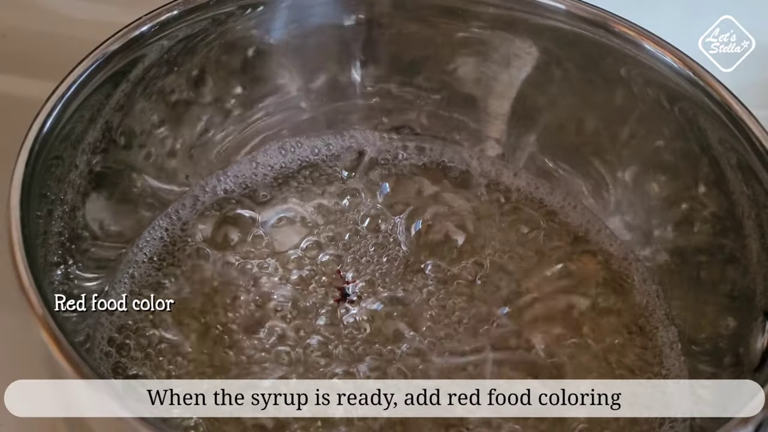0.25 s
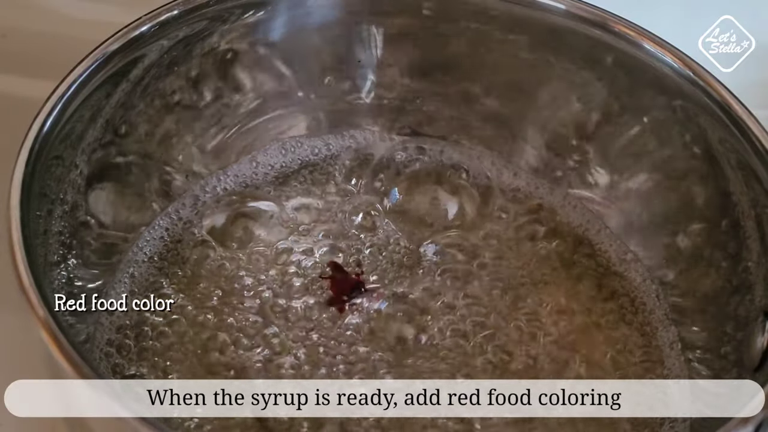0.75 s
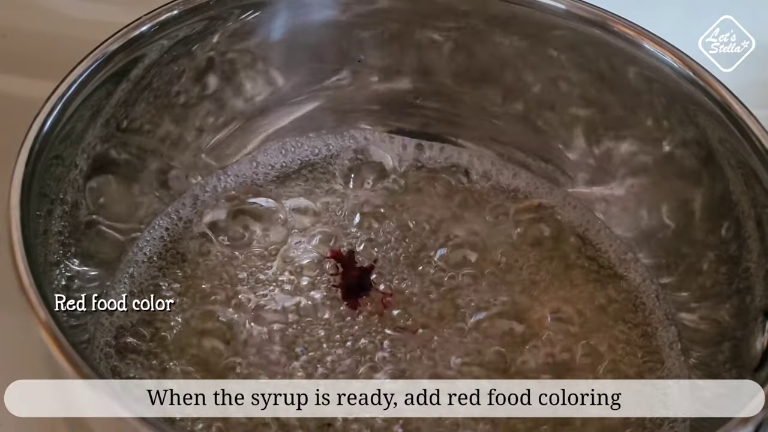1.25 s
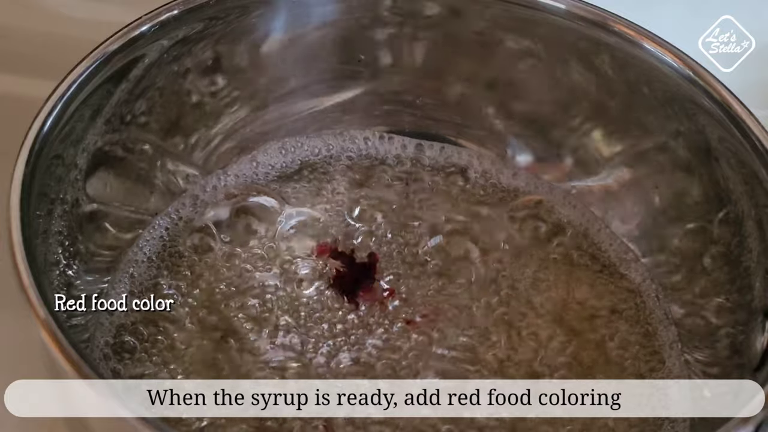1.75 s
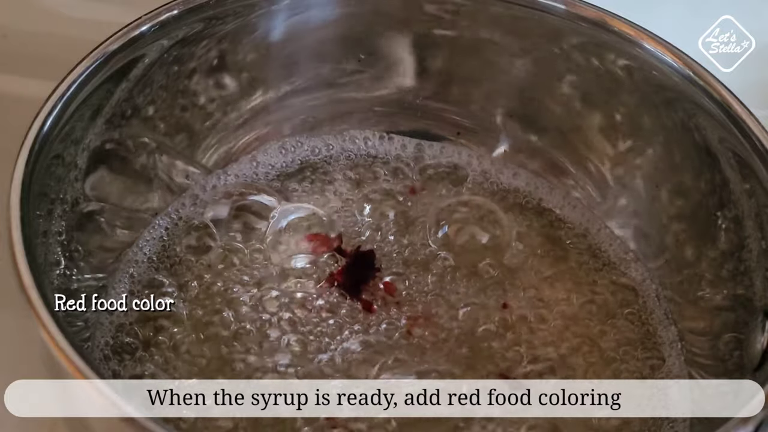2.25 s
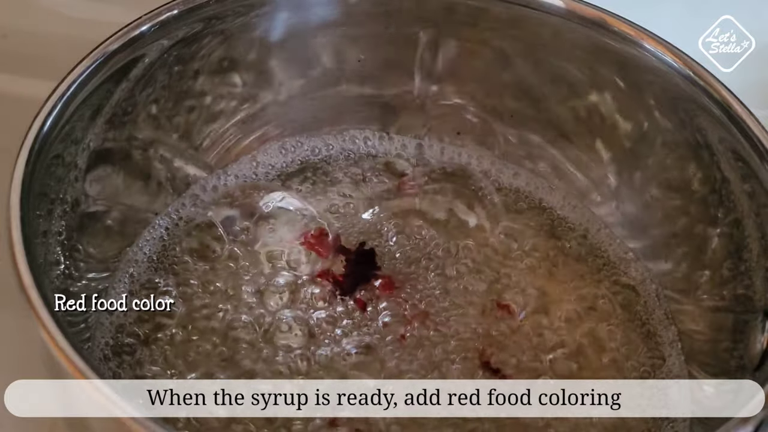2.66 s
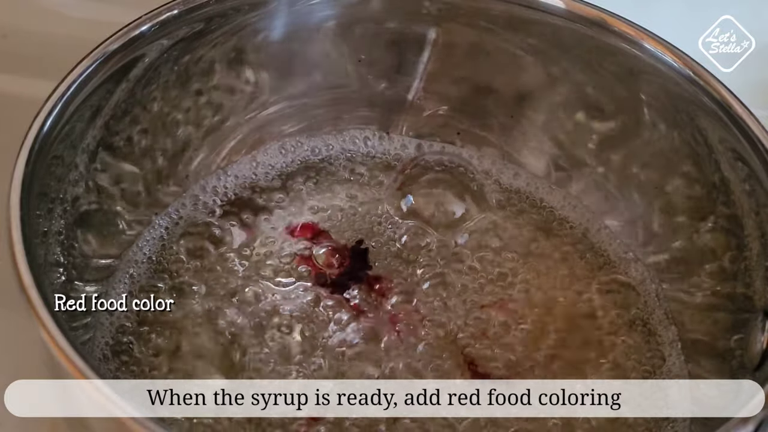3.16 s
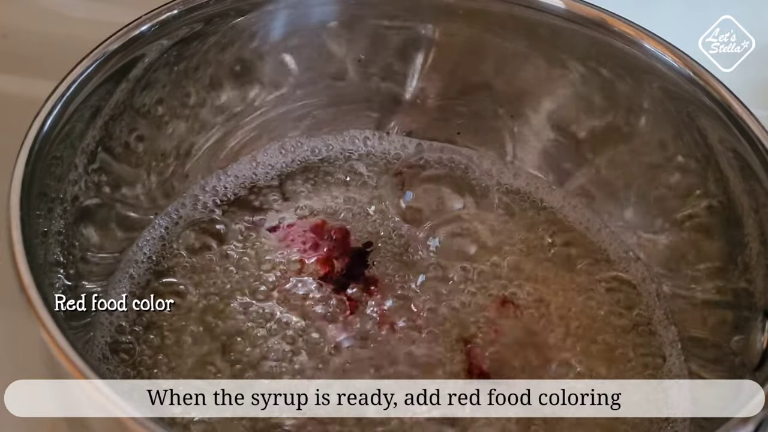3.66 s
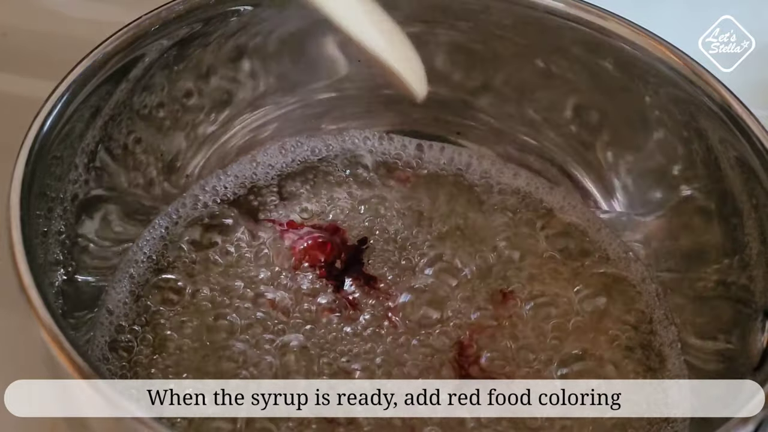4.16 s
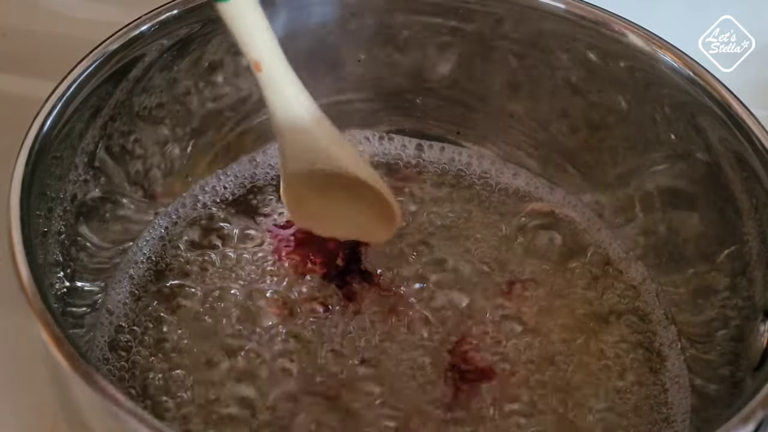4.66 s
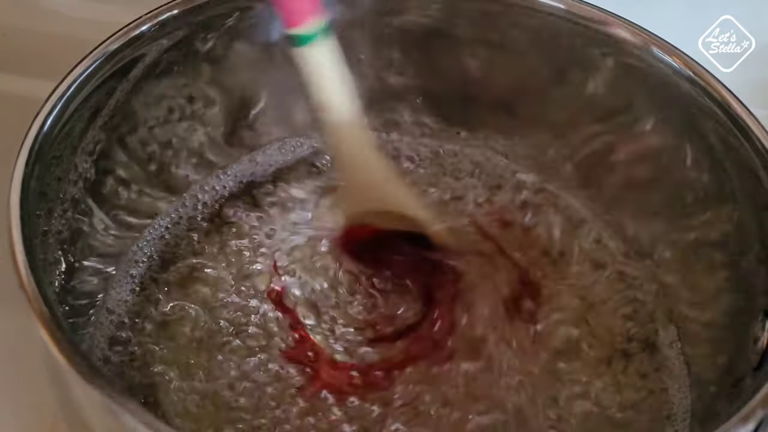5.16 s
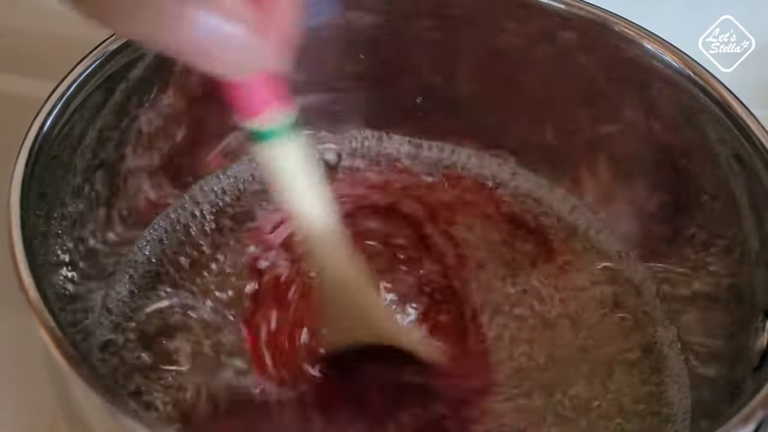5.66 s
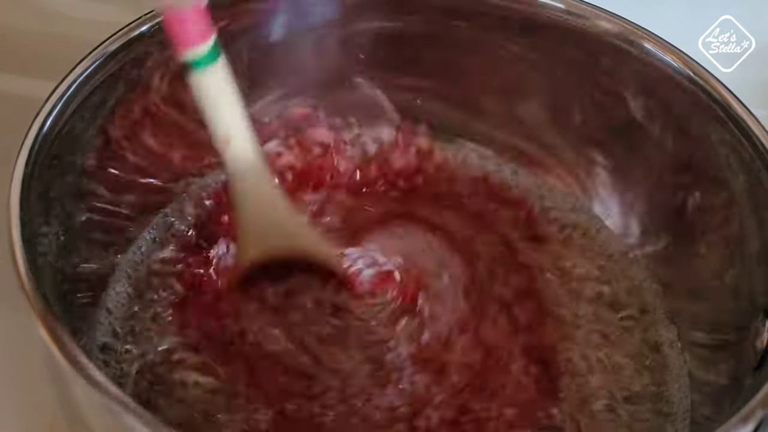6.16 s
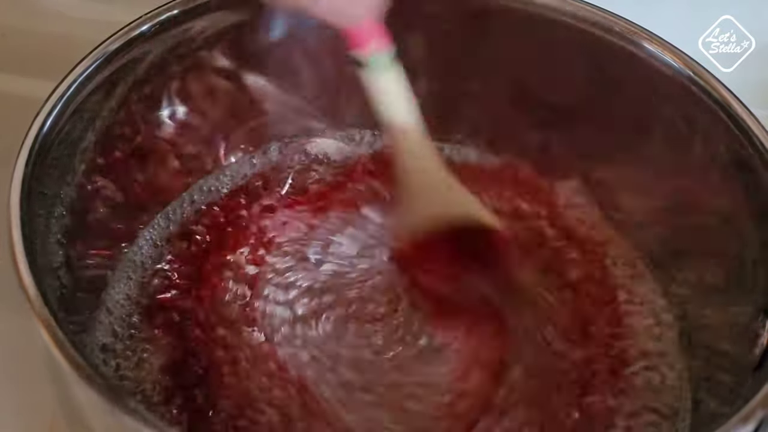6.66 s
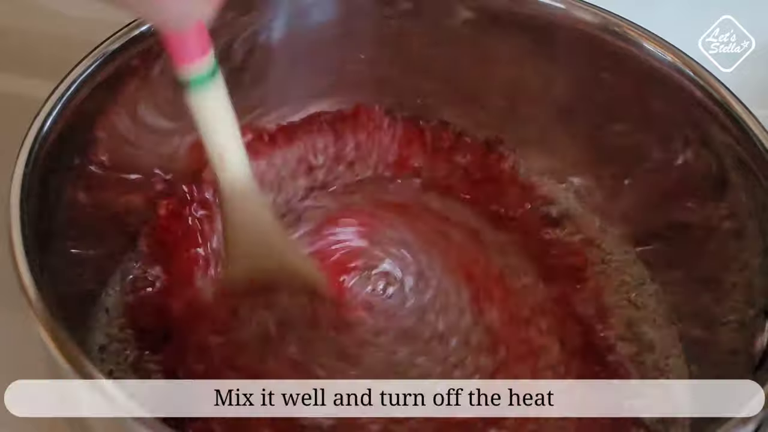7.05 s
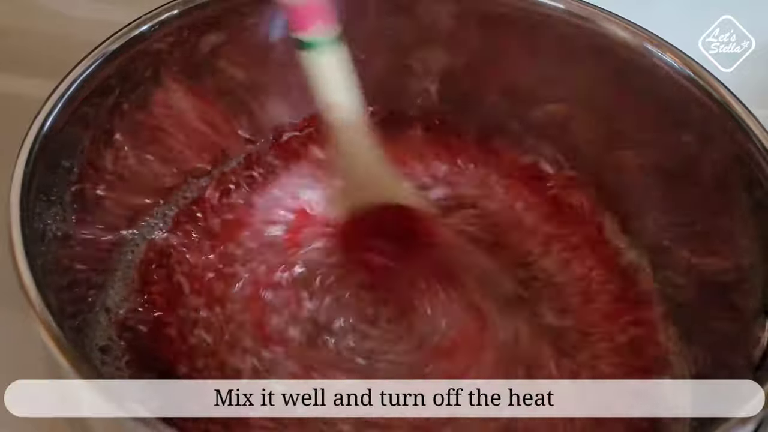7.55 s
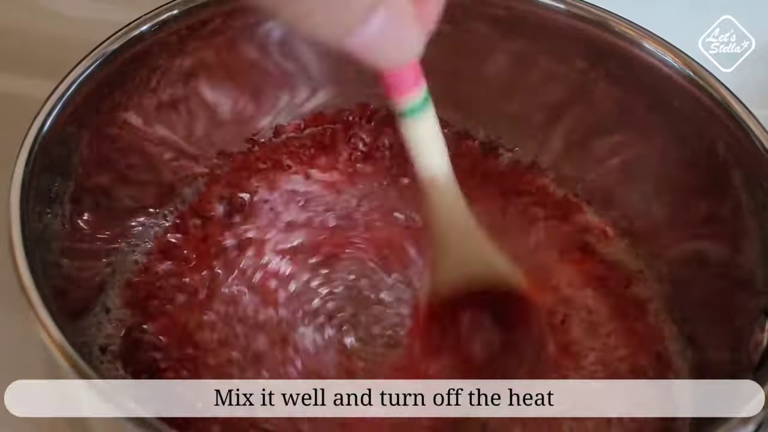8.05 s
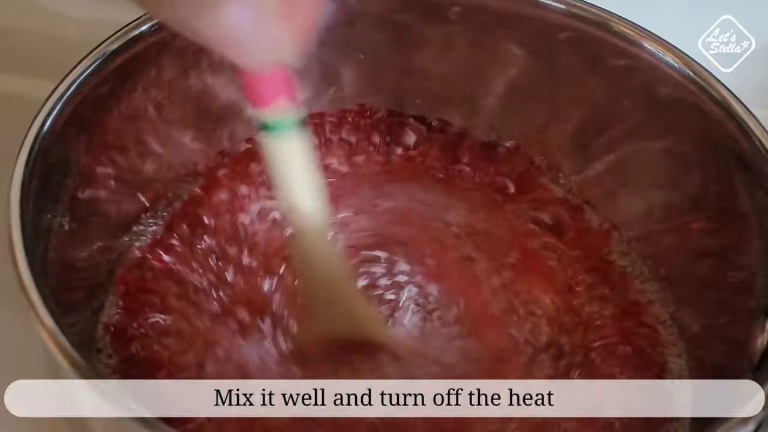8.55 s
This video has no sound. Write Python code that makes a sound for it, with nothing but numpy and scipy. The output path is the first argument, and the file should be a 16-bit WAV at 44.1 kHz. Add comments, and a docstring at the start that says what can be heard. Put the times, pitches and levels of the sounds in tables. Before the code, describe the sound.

Syrup simmers and crackles in a steel pot, with one dull knock, then sizzles and gurgles much louder as it is stirred.

```python
"""Sugar syrup simmers in a steel pot, crackling in swells as its bubbles burst and their cavities ring. Single
bubbles snap, ping and plop, and the air in the pot resonates. From five seconds on a wooden spoon stirs: the
syrup foams up, sizzles much louder and gurgles with each stroke. Near three seconds something knocks dully and
rattles as it settles; near four seconds comes a light knock. The hob hums underneath, in a small kitchen."""
import sys
import numpy as np
from scipy import signal
from scipy.io import wavfile

SR = 44100
rng = np.random.default_rng(int(sys.argv[2]) if len(sys.argv) > 2 else 0)


def waveform_to_disk(signal):
    """Save audio, clipped to [-1, 1], as 16-bit WAV at the path in sys.argv[1]."""
    frames = np.transpose(np.atleast_2d(signal))
    scaled = np.clip(frames, -1, 1) * 32767
    samples = np.round(scaled).astype(np.int16)
    wavfile.write(sys.argv[1], SR, samples)


N = 388080
CUTOFF_HZ = 16000
# contacts of the knock and its rattle: (time [s], strength [dB], hardness [Hz])
CONTACTS = [(3.0694, -17, 400), (3.0833, -26, 2500), (3.110, -36, 1200), (3.188, -25.5, 415),
            (3.285, -41, 1500)]


def boil(gurgle_db, crackle_db, fizz_db, churn):
    """Bubble resonance: the smaller, the higher. Churning frees large bubbles and whips up the finest."""
    # steam hiss: (frequency [Hz], relative density [dB])
    steam_spectrum = [(2000, -16), (4500, 11), (7500, 3), (16000, 3.5)]
    busy = from_db(.45 * (fizz_db + 50))
    slosh = bubbles(170 * busy, 243, 540, cycles=3.7, spread_db=2.5, tilt_db=-1.5, wall_db=-12.5, count=3)
    big = bubbles(380 * busy, 562, 1120, cycles=9.3, spread_db=1.5, tilt_db=1, wall_db=-6.5, count=5)
    small = bubbles(1700 * busy, 1400, 3920, cycles=6.9, spread_db=3.5, tilt_db=2, wall_db=-1, count=11)
    fizz = bubbles(1400 * busy, 4930, 14340, cycles=14, spread_db=6.5, tilt_db=4, wall_db=1.5, count=11)
    fizz = fizz + 0.63 * (churn - .45) * highpass(fizz, 10000, order=1)
    steam = banded_noise(steam_spectrum, flicker_db=3.5) * from_db(-4.5 + 2 * drift(36))
    gurgle = slosh * from_db(gurgle_db - 20 + 11.5 * churn) + big * from_db(gurgle_db - 14 + 8.06 * churn)
    crackle = small * from_db(crackle_db - 3 - 3 * churn)
    return gurgle + crackle + (fizz * from_db(1.35) + steam) * from_db(fizz_db)


def bubbles(per_s, low_hz, high_hz, cycles, spread_db, tilt_db, wall_db, count):
    """Damped oscillators: bubbles burst in random clumps and ring at one of count pitches; rms 1."""
    clumping = from_db(4 * drift(25))
    born = np.flatnonzero(rng.random(N) < per_s * clumping / SR)
    sizes = from_db(spread_db * np.minimum(rng.exponential(1, len(born)), 4))
    sizes *= rng.choice([-1, 1], len(born))
    sizes /= np.sqrt(per_s[born])   # the same power comes from a few bubbles or from many
    pitch_index = rng.integers(0, count, len(born))
    ear_lag = np.round(SR * rng.normal(.0001, .00016, len(born))).astype(int)
    right_at = np.clip(born + ear_lag, 0, N - 1)
    sides = panned(rng.normal(0, 4.0, len(born)))
    out = np.zeros((2, N))
    for k, hz in enumerate(np.geomspace(low_hz, high_hz, count)):
        clicks, mine = np.zeros((2, N)), pitch_index == k
        clicks[0, born[mine]], clicks[1, right_at[mine]] = (sizes * sides)[:, mine]
        tilt = from_db(tilt_db * np.log2(hz / low_hz))
        out += ring(wall_scatter(clicks, wall_db, t60=0.047), hz, cycles / hz) * tilt
    return rms_one(highpass(out, 0.79 * low_hz))


def vigour():
    """Amplitude modulation: clusters and spoon strokes lift the gurgle, crackle and fizz levels [dB]."""
    # the simmer, foaming up once stirred: (time [s], bubbling level [dB], fizz level [dB])
    simmer = [(0, -66, -70.5), (0.7, -70.5, -70), (1.75, -68.5, -67.5), (2.05, -72.5, -67),
              (2.5, -68, -63.5), (2.9, -66.5, -67.5), (4.0, -67.5, -65.5), (5.05, -68.5, -67.5),
              (5.22, -57, -55), (5.5, -53, -48), (5.95, -48, -46), (6.38, -52.5, -50.5), (7.4, -51, -50.5),
              (8.8, -51.5, -52.5)]
    # bubbles bursting together: (time [s], length [s], bubbling lift [dB], fizz lift [dB])
    clusters = [(0.36, 0.16, 8.5, 5), (0.795, 0.055, 8, 8), (0.961, .18, 1, 1), (1.33, .1, 4.5, 5.5),
                (1.555, 0.083, 4, 6), (1.74, 0.12, 5, 3), (2.126, 0.099, 5.5, 8), (3.518, 0.16, 2.5, 1),
                (3.779, .29, 4, 6), (4.242, 0.045, 9.5, 3), (4.487, 0.15, 2, 7), (4.75, 0.17, 4.5, 4),
                (6.785, .06, 0, 4.5)]
    # spoon strokes, each pushing bubbles to the surface: (time [s], length [s], gurgle lift [dB])
    strokes = [(5.538, .13, 4.5), (5.95, 0.08, 2.5), (6.09, 0.15, 4), (6.429, 0.081, 5.5),
               (6.659, 0.19, 4.5), (6.99, .25, 4), (7.39, 0.085, 2), (7.584, 0.056, 5.5),
               (7.684, .085, 7.5), (7.97, 0.086, 4), (8.2, 0.099, 3), (8.41, .14, 3.5)]
    bubbling_db, fizz_db = in_time(simmer)
    for s, length_s, bubbling_lift_db, fizz_lift_db in clusters:
        shape = swell(s, length_s, attack_s=.02, release_s=.035)
        bubbling_db += bubbling_lift_db * shape
        fizz_db += fizz_lift_db * shape
    stroke_db = sum(lift_db * swell(s, length_s, attack_s=.035, release_s=.04)
                    for s, length_s, lift_db in strokes)
    return bubbling_db + stroke_db, bubbling_db + 0.64 * stroke_db, fizz_db + .45 * stroke_db


def single_bubbles(crackle_db, fizz_db, churn):
    """Pitch falls as a cavity grows: small bubbles snap, middling ones ping and large ones plop."""
    # the loudest small bubbles: (time [s], relative level [dB], pitch [Hz], left over right [dB])
    loud_snaps = [(2.3064, -35.5, 8900, 2), (2.6052, -42.5, 4826, 10), (2.9387, -42.5, 7260, 0),
                  (2.981, -32, 13240, 9), (3.0459, -37, 10770, 5), (3.1457, -32, 15200, 7),
                  (3.2175, -38.5, 6950, -3), (3.235, -36, 9800, 5), (3.2933, -31.5, 13700, 8),
                  (3.48, -35, 15200, 8), (4.4844, -37, 13990, 18), (4.534, -35.5, 12210, 15),
                  (4.7722, -38, 5800, -2), (5.1373, -41, 7010, 4), (5.1847, -35.5, 10810, 16),
                  (5.3776, -24.5, 14480, 7), (5.4238, -29, 7500, 7), (5.455, -24, 12520, 4),
                  (5.609, -23, 12520, 4), (5.6984, -24, 9700, 5), (5.724, -24, 9553, 5),
                  (5.924, -26, 9700, 8), (5.9874, -20, 12420, 6), (6.114, -25, 9205, 5),
                  (6.5575, -29, 14720, 8), (6.591, -22, 11670, 4), (7.1693, -22, 11490, 11),
                  (7.6252, -26, 14310, 10), (8.3708, -27, 7704, -9)]
    # middling bubbles: (time [s], relative level [dB], pitch [Hz])
    middling = [(1.38, -50, 3000), (1.421, -52, 1510), (2.306, -42.5, 2493), (2.862, -55.5, 1710),
                (3.647, -50, 1800), (6.7, -37.5, 3070), (6.8574, -37, 3070), (6.98, -37, 3216),
                (7.596, -35, 4230), (8.4584, -38, 4094)]
    # large bubbles, and near four seconds a light knock: (time [s], relative level [dB], pitch [Hz], left over
    # right [dB])
    large = [(1.329, -37, 1700, 6), (4.0094, -43, 1150, 2.5), (5.112, -43.5, 1421, 6), (5.965, -29, 720, 7),
             (6.226, -31, 1400, 7), (6.285, -34, 1593, 5), (7.169, -30, 780, 7), (7.596, -33, 480, -2),
             (8.0, -33.5, 560, 1)]
    weak_snaps = stray_bubbles(fizz_db, 5610, 15000, above_db=8.5, range_db=7.5, count=170)
    weak_cracks = stray_bubbles(crackle_db + 2 * churn, 1600, 5500, above_db=1, range_db=4.5, count=170)
    middling_left = [(*row, 7) for row in middling]   # 7 dB louder on the left
    snaps = bursts([*loud_snaps, *weak_snaps], cycles=1.71, gain_db=0.5, crack_db=-5, wall_db=-3)
    pings = bursts(middling_left, cycles=1.7, gain_db=-3, crack_db=-8.5, wall_db=-1.5)
    cracks = bursts(weak_cracks, cycles=0.55, gain_db=0, crack_db=-1, wall_db=-1.5)
    plops = bursts(large, cycles=0.64, gain_db=-6, crack_db=-4, wall_db=-2)
    return snaps + pings + cracks + plops


def stray_bubbles(level_db, low_hz, high_hz, above_db, range_db, count):
    """A random point process: weaker bubbles of any time, pitch and place follow the boil's level."""
    when, size, pitch, place = rng.random((count, 4)).T
    s = when * (N / SR - .1)
    peak_db = level_db[(s * SR).astype(int)] + above_db + range_db * size
    return zip(s, peak_db, low_hz + (high_hz - low_hz) * pitch, 14 * place - 3.5)


def bursts(events, cycles, gain_db, crack_db, wall_db):
    """Transient excitation: a film tears with a crack, its cavity rings and the wall reflects it."""
    out, t = np.zeros((2, N)), np.arange(SR // 20) / SR
    for s, level_db, hz, pan_db in events:
        age = t * hz / cycles   # the envelope peaks at age 1
        band = signal.butter(2, [hz / 2, min(2.14 * hz, CUTOFF_HZ)], "band", fs=SR, output="sos")
        crack = from_db(crack_db) * rms_one(signal.sosfilt(band, rng.standard_normal((2, len(t)))))
        burst = age * np.exp(1 - age) * (np.sin(2 * np.pi * hz * t) + crack)
        burst = burst + from_db(wall_db) * echoes(burst, t60=.035, delay_s=0.00054, low_hz=490)
        at = round((s + .001) * SR)
        out[:, at:at + len(t)] += burst * from_db(level_db + gain_db) * panned(pan_db)
    return out


def wall_scatter(clicks, wall_db, t60):
    """Scattering: the steel wall answers each burst with a short spray of reflections."""
    r = np.exp(-2 * np.log(1000) / (t60 * SR))
    energy = signal.lfilter([0, 1 - r], [1, -r], clicks ** 2 + 1e-18)
    spray = rng.standard_normal(clicks.shape, dtype=np.float32)
    return clicks + from_db(wall_db) * np.sqrt(energy) * spray


def pot(x, foam, churn):
    """Cavity resonance: churning and foam weaken the pot's air modes; foam absorbs the upper middle."""
    # air modes of the pot: (frequency [Hz], bandwidth [Hz], undamped boost [dB])
    air_modes = [(225, 24, 5.5), (473, 150, 2.5), (768, 144, 8), (1487, 223, 9.5), (2140, 260, 6.5),
                 (3043, 350, 8), (3825, 200, 8), (7540, 440, 3)]
    out = x - 0.5 * foam * signal.lfilter(*signal.iirpeak(3500, 1, fs=SR), x)
    liveliness = 1 - 0.12 * foam - 0.4 * churn
    for hz, width_hz, boost_db in air_modes:
        b, a = signal.iirpeak(hz, hz / width_hz, fs=SR)
        out = out + (from_db(boost_db) - 1) * liveliness * signal.lfilter(b, a, x)
    return out


def knock():
    """Modal vibration: a soft blow and its harder rattle ring a body; the kitchen adds a dull wash."""
    # modes of the struck body: (frequency [Hz], relative level [dB], t60 [s])
    modes = [(132, -12, 0.59), (227.6, -19.5, 0.48), (273.5, 0, 0.24), (284.5, -7.5, 0.18),
             (530, -6.5, 0.14), (802, -11, 0.11), (1255, -11, 0.081), (1370, -10, 0.075), (1660, -15, 0.12)]
    # the knock's wash in the kitchen: (frequency [Hz], relative density [dB])
    wash_spectrum = [(60, -7.5), (135, -6), (260, -5), (390, -11.5), (600, -14), (1000, -23.5), (1500, -25),
                     (3000, -38.5)]
    force, t = np.zeros(N), np.arange(N) / SR
    for s, strength_db, hard_hz in CONTACTS:
        age = np.clip(2 * np.pi * hard_hz * (t - s), 0, 20)
        contact = age * np.exp(-age) * (age < 20)
        force += from_db(strength_db) * contact / contact.sum()
    body = sum(from_db(level_db) * ring(force, hz, t60) for hz, level_db, t60 in modes)
    body = highpass(body, 95)   # the knock carries little deep bass
    since = np.maximum(t - CONTACTS[0][0], 0)
    wash = banded_noise(wash_spectrum) * (1 - np.exp(-since / 0.0009)) * from_db(-30.5 - 91 * since)
    return (from_db(-3) * body + wash) * panned(2.14)


def clatter():
    """A brief impact has a broad spectrum: the knock's hardest contact adds a short bright spray."""
    # the spray: (frequency [Hz], relative density [dB])
    spectrum = [(1500, -5), (3000, -6), (8000, -4), (15000, -11)]
    start_s = max(CONTACTS, key=lambda row: row[2])[0] - .008
    since = np.maximum(np.arange(N) / SR - start_s, 0)
    rise = 1 - np.exp(-since / 0.00069)
    fall = from_db(-47.5 - 120 * since)
    crack = 1 + from_db(5) * np.exp(-since / 0.011)   # the first instant stands out
    return banded_noise(spectrum) * rise * fall * crack


def hob():
    """A harmonic series: the hob's low hum wavers, over a rumble that partly follows its strength."""
    # strength of the hum: (time [s], level [dB])
    strength = [(0.0, -58), (1.2, -53.5), (2.9, -47), (3.5, -48), (4.2, -53), (5.3, -51), (6.0, -47),
                (7.8, -45.5), (8.8, -48)]
    # its harmonics: (multiple [1], relative level [dB])
    harmonics = [(1, 1.5), (2, -12.5), (3, -20)]
    # the hob's rumble: (frequency [Hz], relative density [dB])
    rumble_spectrum = [(25, -15), (50, -5.5), (75, -3.5), (105, -3), (135, -15.5), (185, -15.5),
                       (240, -8.5), (340, -24.5), (600, -43)]
    hum_hz = 75.28
    hum_db, = in_time(strength)
    phase = 2 * np.pi * np.cumsum(hum_hz * (1 + 0.0034 * drift(2.05))) / SR
    hum = sum(from_db(level_db + 1.04 * drift(11.5)) * np.sqrt(2) * np.sin(k * phase)
              for k, level_db in harmonics)
    rumble = from_db(-58 + 0.59 * (hum_db + 50.5)) * banded_noise(rumble_spectrum)
    return from_db(hum_db - 2.4) * hum + rumble


def echoes(x, t60, delay_s, low_hz):
    """Reverberation: dense reflections above low_hz die away exponentially, different at each ear."""
    t = np.arange(int(t60 * SR)) / SR
    tail = rng.standard_normal((2, len(t))) * np.exp(-np.log(1000) * t / t60) * (t > delay_s)
    tail /= np.sqrt(np.sum(tail ** 2, axis=1, keepdims=True))
    return signal.fftconvolve(x, highpass(tail, low_hz), axes=1)[:, :x.shape[1]]


def room_air():
    """Ambient noise: a faint steady floor, strongest in the bass."""
    # the still room: (frequency [Hz], relative density [dB])
    spectrum = [(100, 8), (250, 8), (450, -2.5), (1500, -3.5), (4000, -15), (16000, -13.5)]
    return from_db(-68.5) * banded_noise(spectrum)


def banded_noise(spectrum, flicker_db=0):
    """A diffuse field: half-octave noise bands, alike at both ears only in the bass; rms 1."""
    # likeness of left and right: (frequency [Hz], coherence [0-1])
    coherence = [(60, 0.86), (250, 0.6), (500, 0.14), (1000, 0), (2000, 0)]
    edges = 22 * 2 ** np.arange(0, 9.6, .5)
    out, white = 0, rng.standard_normal((2, 2, N))
    for k, (low, high) in enumerate(zip(edges, edges[1:])):
        if high < spectrum[0][0] or low > spectrum[-1][0]:
            continue
        hz = np.sqrt(low * high)
        band = signal.butter(2, [low, high], "band", fs=SR, output="sos")
        mid, side = signal.sosfilt(band, white[k % 2])
        alike = at_hz(coherence, hz)
        gain = from_db(at_hz(spectrum, hz) + (flicker_db * drift(10) if flicker_db else 0))
        out = out + gain * (np.sqrt(1 + alike) * mid + np.sqrt(1 - alike) * side * [[1], [-1]])
    return rms_one(out)


def ring(clicks, hz, t60):
    """A damped resonator: a unit click starts a decaying sine of height 1."""
    r, w = np.exp(-np.log(1000) / (t60 * SR)), 2 * np.pi * hz / SR
    return signal.lfilter([0, np.sin(w)], [1, -2 * r * np.cos(w), r * r], clicks + 1e-18)


def swell(start_s, length_s, attack_s, release_s):
    """An envelope: linear rise to 1, hold, exponential decay."""
    age = np.arange(N) / SR - start_s
    return np.clip(age / attack_s, 0, 1) * np.exp(-np.maximum(age - length_s, 0) / release_s)


def drift(rate_hz):
    """Low-passed noise: a slow random wander of rms 1."""
    r = np.exp(-80 * np.pi * rate_hz / SR)   # one step every 40 samples
    slow = signal.lfilter([1], [1, -2 * r, r * r], rng.standard_normal(N // 40 + 2002))[2000:]
    return np.interp(np.arange(N) / 40, np.arange(len(slow)), rms_one(slow))


def highpass(x, hz, order=2):
    """Attenuation below hz."""
    return signal.sosfilt(signal.butter(order, hz, "high", fs=SR, output="sos"), x)


def in_time(rows):
    """Linear interpolation of each column at every sample."""
    s, *columns = np.transpose(rows)
    return [np.interp(np.arange(N) / SR, s, c) for c in columns]


def at_hz(points, hz):
    """Interpolation on a log-frequency axis."""
    frequencies, values = np.transpose(points)
    return np.interp(np.log(hz), np.log(frequencies), values)


def panned(pan_db):
    """Left and right gains for an interaural level difference."""
    return from_db(np.array([[1], [-1]]) * pan_db / 2)


def from_db(db):
    """Decibels to gain."""
    return 10 ** (np.asarray(db) / 20)


def rms_one(x):
    """Normalisation to rms 1."""
    return x / np.sqrt(np.mean(x ** 2) + 1e-20)


def scene():
    """Superposition: the pot, a little to the left, sounds with the knock, the hob and the kitchen."""
    # state of the syrup, which the spoon churns and whips up: (time [s], churning [0-1], foam [0-1])
    syrup_state = [(0, 0, 0.87), (2.0, 0.18, 0), (4.4, 0.26, 0.38), (5.1, 0.52, 0.6), (5.5, 1, 0.99),
                   (6.5, 0.61, 0.4), (7.6, 0.98, 0.2), (8.8, 0.89, 0.1)]
    churn, foam = in_time(syrup_state)
    gurgle_db, crackle_db, fizz_db = vigour()
    singles = single_bubbles(crackle_db, fizz_db, churn)
    boiling = boil(gurgle_db, crackle_db, fizz_db, churn) * panned(2.3)
    syrup = pot(boiling + singles, foam, churn)
    kitchen = from_db(-9.5) * echoes(syrup, t60=.35, delay_s=0.0047, low_hz=200)
    return syrup + kitchen + knock() + clatter() + hob() + room_air()


def record(dry):
    """Band limiting: a steep low-pass cuts the highest treble."""
    return signal.sosfilt(signal.ellip(10, .1, 80, CUTOFF_HZ, fs=SR, output="sos"), dry)


dry = scene()
out = record(dry)
waveform_to_disk(out)
```